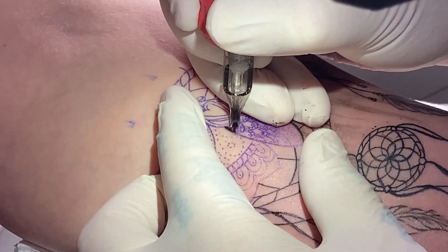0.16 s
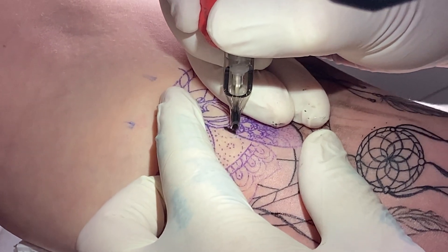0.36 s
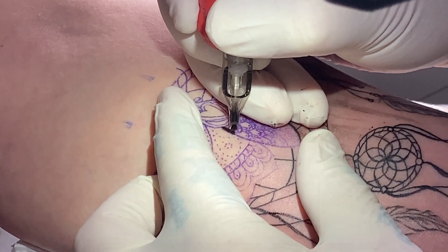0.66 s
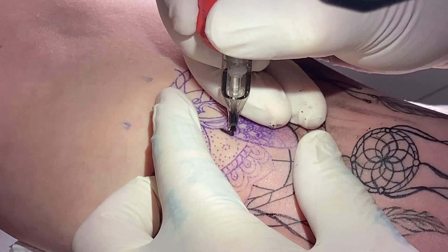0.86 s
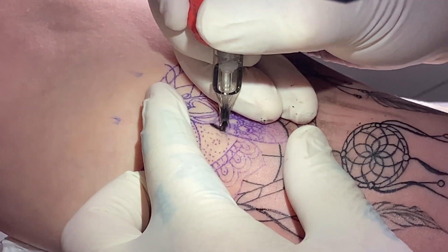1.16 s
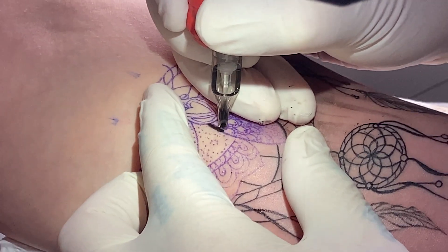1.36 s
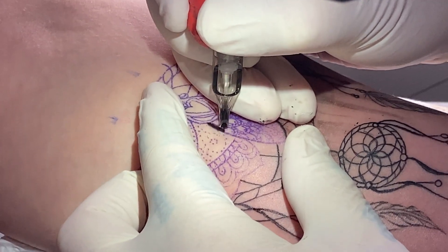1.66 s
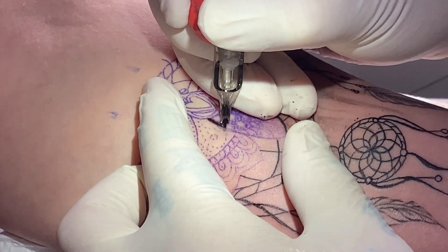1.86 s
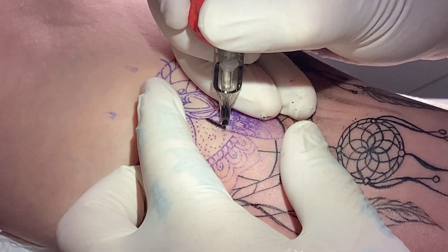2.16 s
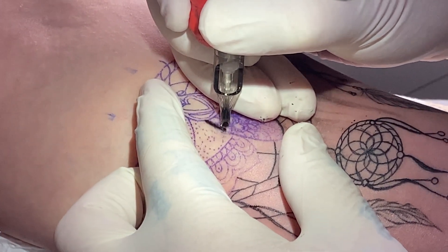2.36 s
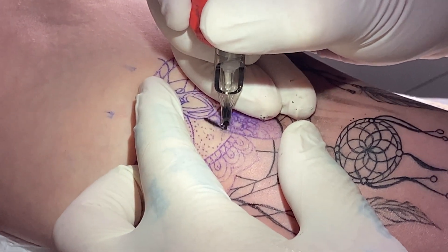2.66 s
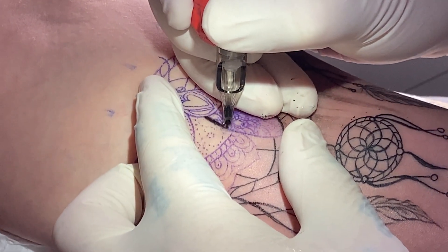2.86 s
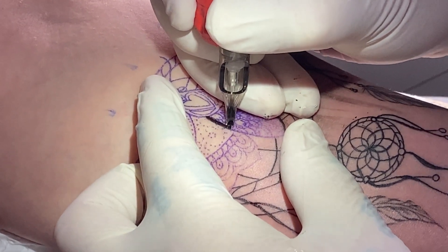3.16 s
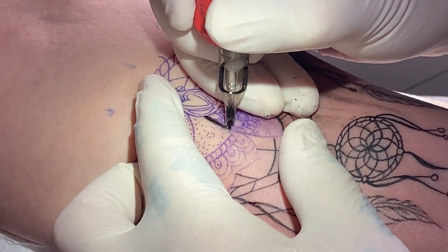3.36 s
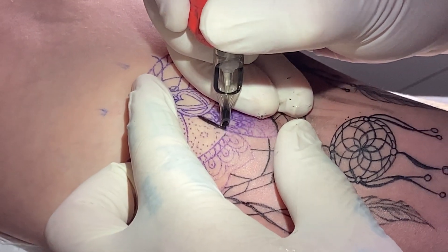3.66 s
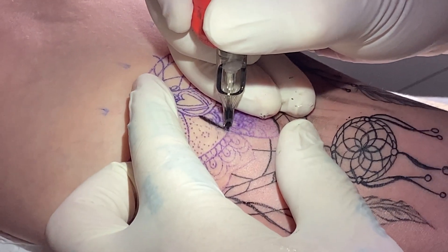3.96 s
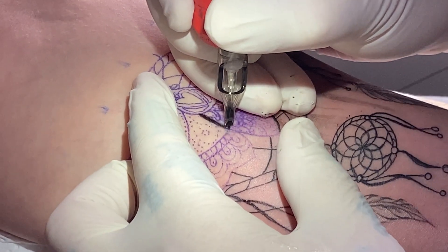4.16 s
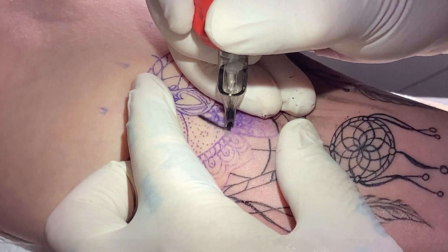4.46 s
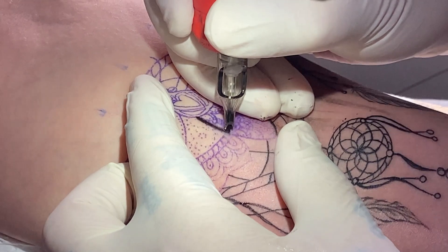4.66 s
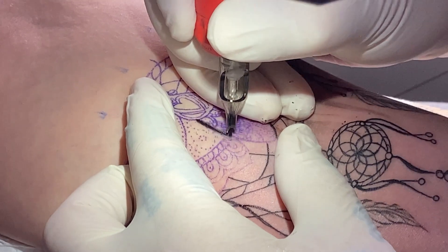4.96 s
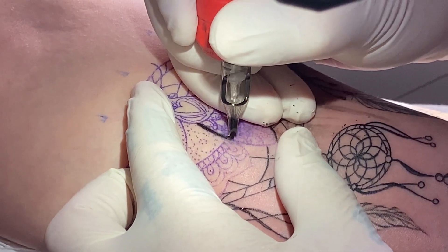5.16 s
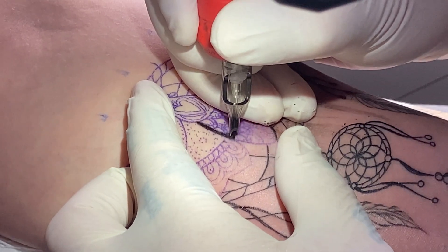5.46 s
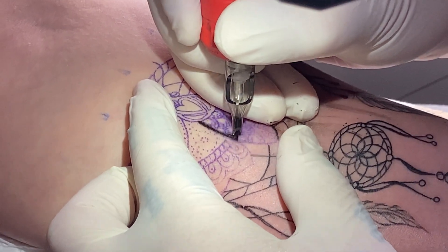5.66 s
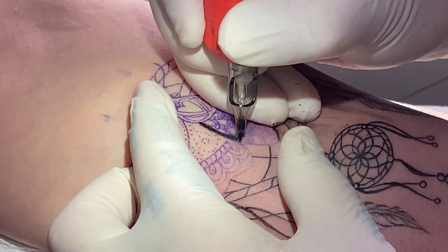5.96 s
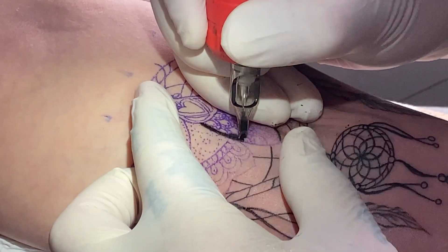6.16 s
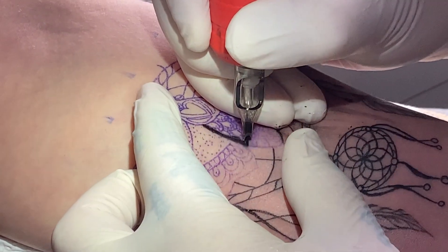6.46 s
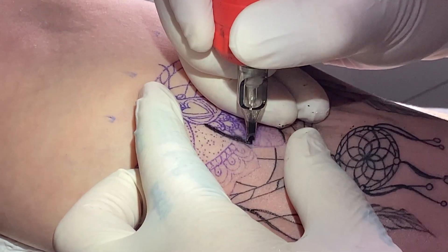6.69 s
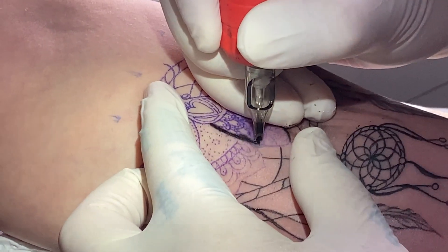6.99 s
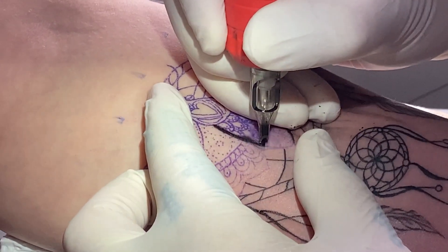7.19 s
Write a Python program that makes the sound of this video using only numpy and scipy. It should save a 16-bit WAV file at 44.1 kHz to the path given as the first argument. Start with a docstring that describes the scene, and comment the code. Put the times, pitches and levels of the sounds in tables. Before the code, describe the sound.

A rotary tattoo machine buzzes without a break, close to the microphone in a small room. The needle rattles rapidly in its plastic cartridge, bright and nasal, with a high metallic ticking and slight hiss. A few sharper clicks stand out in the first half. The pitch sags very slightly as the needle presses into the skin, then recovers a little near the end. Faint motor hum and glove rubbing lie underneath.

```python
"""A rotary tattoo machine draws a line on an arm, close to a phone in a small room. From the start, over faint
rumble, glove rub and motor hum, the needle drive strikes, bounces and rattles back about 83 times a second in
its plastic cartridge, whose tube rings. For four seconds an occasional stroke slams home while the needle
presses deeper: the motor slows and the rebound hardens. The speed is lowest after five seconds; near seven it
recovers a little, a brief burst sounds, and one more stroke lands hard."""
import sys
import numpy as np
from scipy import signal
from scipy.fft import rfft, irfft, next_fast_len
from scipy.io import wavfile
from scipy.ndimage import uniform_filter1d

SR = 44100
rng = np.random.default_rng(int(sys.argv[2]) if len(sys.argv) > 2 else 0)


def int16_out(signal):
    """Quantize to a 16-bit WAV file."""
    q = np.round(np.clip(np.atleast_2d(signal).T, -1, 1) * 32767)
    wavfile.write(sys.argv[1], SR, q.astype(np.int16))


N = 323253
TIME = np.arange(N) / SR
PADDED = next_fast_len(N + SR)
BINS_HZ = np.maximum(np.arange(PADDED // 2 + 1) * SR / PADDED, 1)


def undb(db):
    """Amplitude ratio of a level in decibels."""
    return 10 ** (np.asarray(db) / 20)


def unit(x):
    """Normalisation to unit rms."""
    return x / np.sqrt(np.mean(x ** 2))


def over_time(table):
    """Linear interpolation of a time table at every sample."""
    return np.interp(TIME, *np.transpose(table))


def over_frequency(table):
    """Interpolation of each column of a table along log frequency."""
    hz, *columns = np.transpose(table)
    return [np.interp(np.log(BINS_HZ), np.log(hz), c) for c in columns]


def under_load(light, pressed, load):
    """Linear interpolation from a needle barely touching (load 0) to one pressed home (load 1)."""
    return light + (pressed - light) * load


def filtered(x, response):
    """Linear filtering: the spectrum is multiplied by a frequency response."""
    return irfft(rfft(x, PADDED) * response, PADDED)[..., :N]


def colour(x, spectrum):
    """Minimum-phase filtering: the response is causal, so attacks stay sharp."""
    cepstrum = irfft(np.log(undb(over_frequency(spectrum)[0])), PADDED)
    cepstrum[0] /= 2
    return filtered(x, np.exp(rfft(2 * cepstrum[:PADDED // 2], PADDED)))


def drift(rate_hz):
    """Low-pass noise: random steps, smoothed twice."""
    hold = int(SR / rate_hz)
    steps = np.repeat(rng.standard_normal(N // hold + 1), hold)
    return unit(uniform_filter1d(uniform_filter1d(steps, hold), hold)[:N])


def stereo_noise(side_db):
    """Partial coherence: noise that is mostly alike left and right."""
    mid, side = rng.standard_normal((2, N))
    return mid + undb(side_db) * side * np.array([[1], [-1]])


def decay_envelope(x, decay_s, samples):
    """Exponential energy decay: the rms envelope of x with a fading tail."""
    fade = np.exp(-2 * TIME[:samples] / decay_s)
    return np.sqrt(np.abs(signal.fftconvolve(x ** 2, fade / fade.sum())[:N]))


def chatter(blows, decay_s, clean_db):
    """Impact: a burst of tiny random contacts and a clean one, spread as bending waves disperse."""
    loose = decay_envelope(blows, decay_s, samples=512) * rng.standard_normal(N)
    dispersion = np.exp(-2j * np.pi * decay_s * np.sqrt(BINS_HZ * SR / 2))  # treble arrives first
    return loose + undb(clean_db) * filtered(blows, dispersion)


# spectrum of the room and handling rumble: (frequency [Hz], level [dB])
RUMBLE_SPECTRUM = [(15, -34), (28, -23), (40, -5), (58, 1), (80, 1.5), (100, -4.5), (130, -7.5), (400, -32),
                   (1500, -33)]
# spectrum of gloves rubbing on skin: (frequency [Hz], level [dB])
RUB_SPECTRUM = [(60, -36), (130, 1.5), (220, 0.5), (330, -5), (520, -3.5), (800, -11), (1500, -10.5),
                (4000, -38)]
# shifts of grip: (start [s], duration [s], rub level [dB], rumble level [dB])
GRIP_SHIFTS = [(0.0, 0.98, -72.5, -87), (1.58, 0.57, -71.5, -76), (2.15, 1.07, -69, -77),
               (3.2, 0.39, -71, -71), (3.747, 0.19, -70.5, -71), (4.3, 0.23, -88, -71),
               (4.594, 0.082, -67.5, -69), (4.7, .65, -75, -86), (7.05, .3, -68, -83)]


def hands(resting_rub_db=-73, resting_rumble_db=-75, fade_s=.053, flutter_db=2.0):
    """Friction noise of gloves on skin over a faint rumble; each shift of grip adds power to both."""
    rub_power, rumble_power = undb(resting_rub_db) ** 2, undb(resting_rumble_db) ** 2
    for start, length, rub_db, rumble_db in GRIP_SHIFTS:
        moving = np.clip(np.minimum(TIME - start, start + length - TIME) / fade_s + .5, 0, 1)
        rub_power += (moving * undb(rub_db)) ** 2
        rumble_power += (moving * undb(rumble_db)) ** 2
    rub = unit(colour(stereo_noise(side_db=-8.5), RUB_SPECTRUM)) * undb(flutter_db * drift(24.98))
    rumble = unit(colour(stereo_noise(side_db=-7), RUMBLE_SPECTRUM))
    return rub * np.sqrt(rub_power) + rumble * np.sqrt(rumble_power)


# spectrum of the reverberant tail: (frequency [Hz], level [dB])
ROOM_SPECTRUM = [(400, -28.5), (1100, -21.5), (1750, -6.5), (2400, -16), (3700, -8), (5000, -6),
                 (5900, -3.5), (7300, -7), (9900, -4), (12000, -6.5), (15500, -8)]


def room(x, wet_db=-11.0, t60_s=.16):
    """Diffuse field of couch and near walls: noise, unrelated at each port, follows the sound's energy."""
    envelope = decay_envelope(x, t60_s / np.log(1000), samples=SR // 2)
    return undb(wet_db) * envelope * unit(colour(rng.standard_normal((2, N)), ROOM_SPECTRUM))


# direct sound at the two microphone ports: (frequency [Hz], left minus right [dB], left lag [ms])
PORT_PATHS = [(503, 63, 0.033), (1085, 6.5, 0.24), (1700, 15, 0.12), (3080, 25, 0.31), (4180, 2, 0.24),
              (5480, 7, 0.29), (7140, -1, 0.29), (9220, 0, 0.2737), (11330, 0, 0.267), (15700, 0.5, 0.251)]


def ports(x):
    """Path delay and acoustic shadow: the left port hears later; the phone shades the right midrange."""
    pan_db, lag_ms = over_frequency(PORT_PATHS)
    delay = np.exp(-2j * np.pi * BINS_HZ * lag_ms / 1000)
    gains = undb(np.array([pan_db, -pan_db]) / 2)
    gains /= np.sqrt(np.mean(gains ** 2, axis=0))
    return filtered(x, gains * np.array([delay, np.ones_like(delay)]))


# partials of the motor hum: (multiple of the stroke rate [1], level [dB])
HUM_HARMONICS = [(1, -5.5), (2, 3), (3, -16.5), (4, -27), (5, -20.5), (6, -32)]


def hum(turns, load, loaded_db=-67.5, unloaded_change_db=-5, knee=.15, waver_db=1.5, pan_db=2.5):
    """Forced vibration: the eccentric shakes the housing, most at twice the stroke rate and under load."""
    tone = sum(undb(db + waver_db * drift(14)) * np.sin(2 * np.pi * round(k) * turns)
               for k, db in HUM_HARMONICS)
    level_db = loaded_db + unloaded_change_db * np.exp(-load / knee)
    return unit(tone) * undb(level_db + pan_db * np.array([[.5], [-.5]]))


# modes of the cartridge tube and grip: (frequency [Hz], width [Hz], level [dB])
TUBE_MODES = [(1200, 160, -10.5), (1596, 65, -12.5), (1736, 346, 2.5), (1860, 880, -36), (3778, 470, -10.5)]


def tube(strike, rattle, level_db=-47, rattle_db=-2.0, lag_s=.0003):
    """Resonance: tube and grip ring at each strike, less at the rattle, and make the buzz nasal."""
    blows = np.sqrt(strike) + undb(rattle_db) * np.sqrt(rattle)  # the root evens out the blows
    force = chatter(blows, decay_s=.0009003, clean_db=1.5)
    response = sum(undb(db) / (1 + 1j * (BINS_HZ ** 2 - hz ** 2) / (BINS_HZ * width)) ** 2
                   for hz, width, db in TUBE_MODES)
    delay = np.exp(-2j * np.pi * BINS_HZ * lag_s)
    return undb(level_db) * unit(filtered(force, response * delay))


# spectrum of the metal snap: (frequency [Hz], level [dB])
SNAP_SPECTRUM = [(3000, -36), (9000, -30), (10900, -2.5), (11600, -1.5), (12700, -1), (13600, -7),
                 (15100, 3.5), (15700, 0.5), (16000, -9.5)]
# base level of the snap, before load and flicker: (time [s], level [dB])
SNAP_CONTOUR = [(0.0, -38.0), (0.25, -40.5), (0.33, -37), (0.58, -41.5), (0.65, -36.5), (0.86, -37.0),
                (1.14, -45.5), (1.21, -40), (1.28, -43), (1.35, -36.5), (1.6, -40.5), (1.73, -36.5),
                (2.96, -37.5), (3.03, -43.5), (3.11, -38), (3.42, -40), (5.76, -42.5), (7.33, -41)]


def snap(strike, rattle, load, rattle_db=-8, drag_db=.35, sputter_db=1.3):
    """Hard impact: metal meets its stop in a brief, high tick that wavers with the skin's drag."""
    ticks = chatter(strike + undb(rattle_db) * rattle, decay_s=.0005, clean_db=-1)
    flicker_db = sputter_db * drift(70) + drag_db * drift(12)
    level_db = over_time(SNAP_CONTOUR) + under_load(2.3, 1.2, load) + flicker_db
    return unit(colour(ticks, SNAP_SPECTRUM)) * undb(level_db)


# spectrum of a plastic knock: (frequency [Hz], level [dB])
KNOCK_SPECTRUM = [(700, -49.5), (1200, -28.5), (2400, -20), (3000, -16.5), (4500, -18), (5300, -5.5),
                  (5850, -3), (6500, -7.5), (7600, -8.5), (8400, -0.5), (9900, 3.5), (10800, -4),
                  (12400, -2), (15500, -12.5)]


def cartridge(blows, level_db=-34, waver_db=.53, hiss_db=-13, crossover_hz=7500):
    """Damped impacts: plastic knocks, whose treble dies sooner, over the hiss of the motor brushes."""
    hiss = undb(hiss_db) * rng.standard_normal(N)
    softened = blows ** .72
    dull = unit(chatter(softened, decay_s=.002, clean_db=-13))
    bright = unit(chatter(softened, decay_s=.0014, clean_db=-18))
    treble_share = 1 / (1 + (crossover_hz / BINS_HZ) ** 8)
    force = filtered(dull, np.sqrt(1 - treble_share)) + filtered(bright, np.sqrt(treble_share)) + hiss
    return unit(colour(force, KNOCK_SPECTRUM)) * undb(level_db + waver_db * drift(8))


# strokes that slam home, and one brief burst at 6.79 s: (time [s], impulse level [dB])
HARD_STROKES = [(0.5393, -7), (0.9323, -4.5), (1.385, -8), (1.888, 0.5), (2.0777, 0), (2.2822, -2),
                (2.9402, 0), (3.1696, -2), (3.71, -4), (6.794, -6), (7.1692, -7)]


def hard_knocks():
    """Impulse response: a single hard stroke excites both a plastic knock and a metal tick."""
    times, db = np.transpose(HARD_STROKES)
    blows = np.bincount((times * SR).astype(int), undb(db), N)
    knock = colour(chatter(blows, decay_s=.002, clean_db=-20), KNOCK_SPECTRUM)
    tick = colour(chatter(blows, decay_s=.0005, clean_db=-6), SNAP_SPECTRUM)
    return knock + tick


def contacts(turns, phase, db, jitter, scatter_db, count=640):
    """Quasi-periodic impulse train: one contact a turn, with phase and jitter given in turns."""
    timing, chance = rng.standard_normal((count, 2)).T
    hardness = unit(chance - .45 * np.roll(chance, 1))  # a hard blow tends to follow a soft one
    onsets = np.interp(np.arange(count) + jitter * timing, turns - phase, np.arange(N)).astype(int)
    inside = (onsets > 0) & (onsets < N - 1)
    strength = undb(scatter_db * 1.4 * np.tanh(hardness / 1.3))
    return np.bincount(onsets[inside], strength[inside], N) * undb(db)


def needle_drive(turns, load):
    """Contact bounce: the bar strikes, then rattles; load hardens the rebound, delays it and the return."""
    strike = contacts(turns, phase=0, db=.5, jitter=.001, scatter_db=3.3)
    bounce = contacts(turns, phase=.145, db=-4.5, jitter=.035, scatter_db=4)
    rebound = contacts(turns, phase=under_load(.41, .48, load), db=under_load(-14, -3.5, load),
                       jitter=.022, scatter_db=4)
    back = contacts(turns, phase=under_load(.665, .79, load), db=under_load(-4, -7, load),
                    jitter=.028, scatter_db=5)
    return strike, bounce + rebound + back


# motor speed, sagging as the needle presses deeper: (time [s], stroke rate [Hz])
STROKE_RATE = [(0.0, 84.18), (1.01, 83.8), (1.22, 84.03), (1.44, 83.83), (2.19, 83.37), (2.56, 83.57),
               (3.3, 83.19), (3.87, 82.98), (4.07, 82.66), (4.93, 82.21), (5.13, 82.12), (5.67, 82.15),
               (6.77, 82.57), (6.97, 82.44), (7.33, 82.86)]


def motor(light_hz=83.95, pressed_hz=82.55, first_strike_s=.0042):
    """Speed droop: the slower the motor, the greater its load; rotation is the integral of speed."""
    speed_hz = over_time(STROKE_RATE)
    load = np.clip((light_hz - speed_hz) / (light_hz - pressed_hz), 0, 1)
    turns = np.cumsum(speed_hz) / SR - first_strike_s * speed_hz[0]
    return turns + .009 * drift(14), load


def scene():
    """Superposition: one motor times the knocks, snap, tube and hum; room and hands lie beneath."""
    turns, load = motor()
    strike, rattle = needle_drive(turns, load)
    machine = cartridge(strike + rattle) + snap(strike, rattle, load) + tube(strike, rattle)
    machine += hard_knocks()
    return ports(machine) + room(machine) + hum(turns, load) + hands()


def record(dry):
    """Band limiting: the phone's steep low-pass filter cuts the top treble."""
    cutoff_hz = 15850
    return signal.sosfilt(signal.ellip(12, .1, 75, cutoff_hz, fs=SR, output="sos"), dry)


dry = scene()
out = record(dry)
int16_out(out)
```